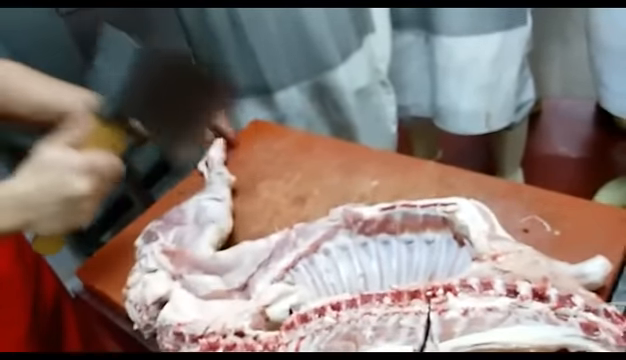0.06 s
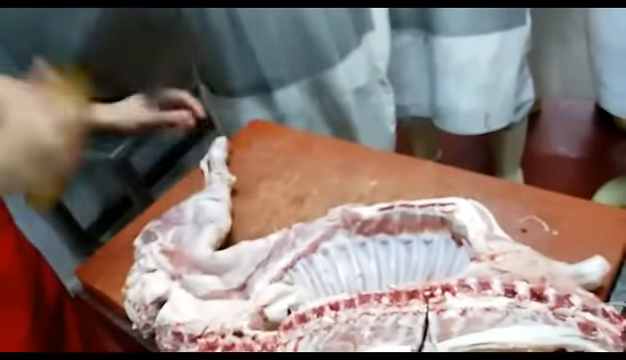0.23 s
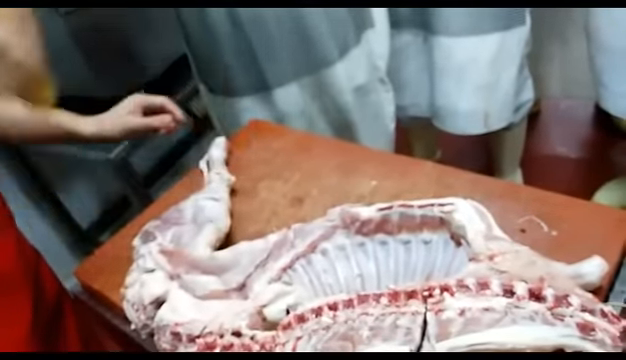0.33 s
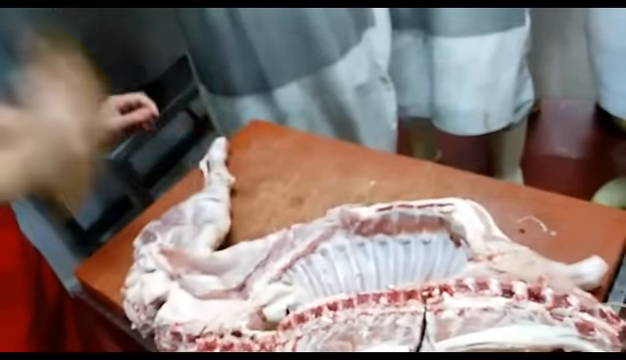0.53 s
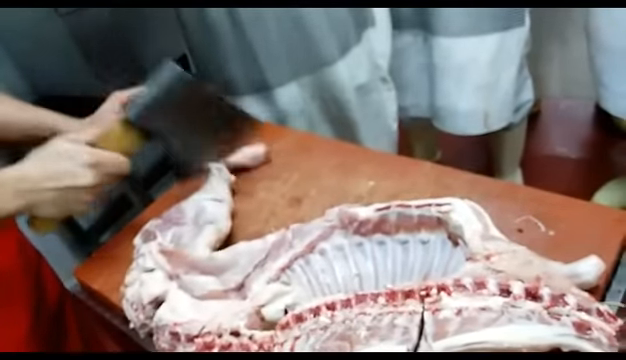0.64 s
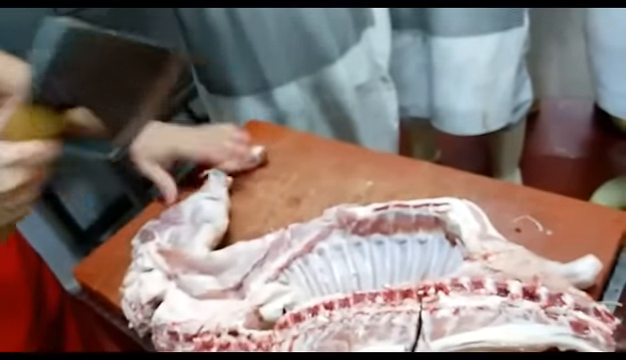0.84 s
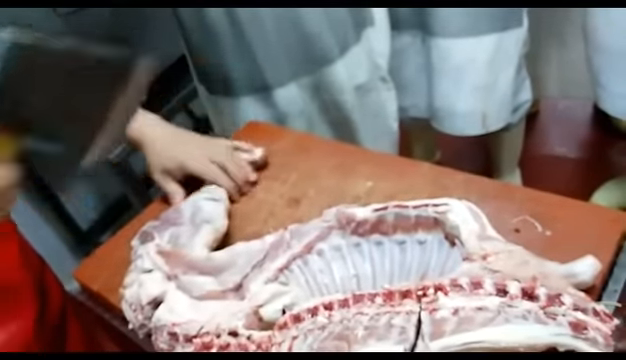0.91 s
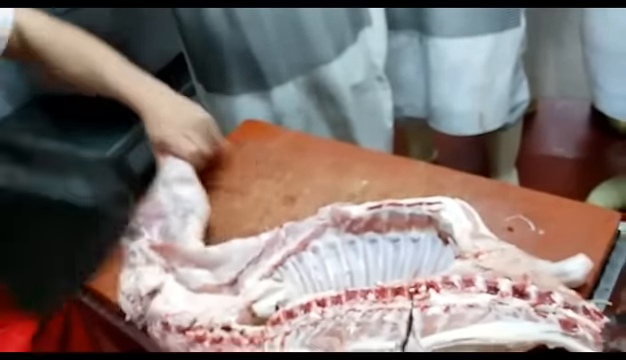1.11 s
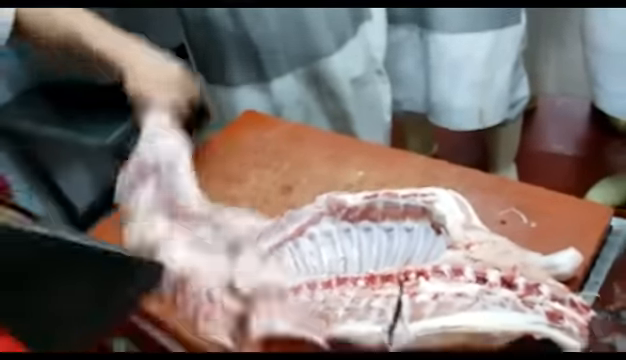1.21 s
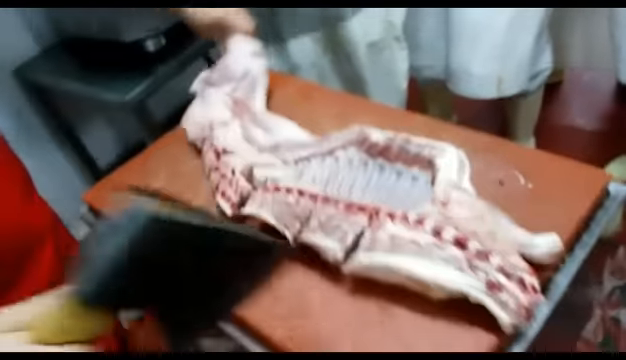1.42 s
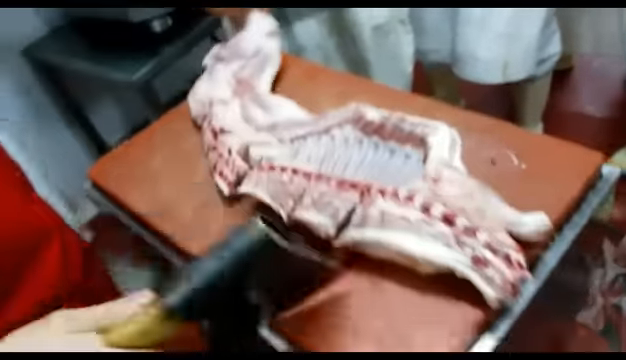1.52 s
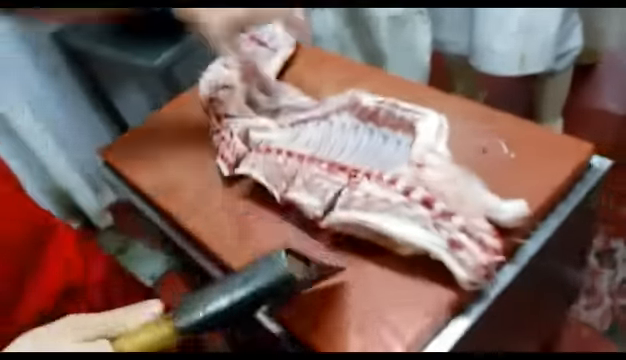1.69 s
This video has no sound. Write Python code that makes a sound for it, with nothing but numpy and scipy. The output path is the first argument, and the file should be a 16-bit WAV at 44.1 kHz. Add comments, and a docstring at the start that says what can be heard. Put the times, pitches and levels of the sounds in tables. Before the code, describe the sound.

Cleaver chopping meat, close and loud, in a hard-walled room with faint air and low mains hum. At 0.23 s a hard, bright crack hits the wooden block, block and blade ringing with strong echo. Wet rubbing and sticky smacks come around 0.8-1.0 s. At 1.16 s a duller, meaty thud crunches bone. The carcass knocks the table hollowly at 1.38 s, then slides wetly until about 1.75 s.

```python
"""Room air and a machine's mains hum come first, in a hard-walled butcher's room with a stereo microphone.
A heavy cleaver then chops a lamb shank on a wooden block: noise bursts, ringing modes and a wall answer,
loud enough to drive the recorder's limiter. Wet meat rubs and smacks in swells of grainy noise; a duller
blow thuds on damped sines and crunches bone in rough noise. The swung carcass knocks the table, rung by
modes, and slides wetly over the block."""
import sys
import numpy as np
from scipy import signal
from scipy.fft import rfft, irfft, next_fast_len
from scipy.io import wavfile
from scipy.ndimage import uniform_filter1d, minimum_filter1d, map_coordinates

SR = 44100
rng = np.random.default_rng(int(sys.argv[2]) if len(sys.argv) > 2 else 0)


def to_wav(sig):
    """Store sig (one row per channel, or 1-D mono) as 16-bit WAV at the path in sys.argv[1].

    Samples outside -1..1 are clipped; the rate is SR.
    """
    pcm = np.clip(np.atleast_2d(sig), -1, 1) * 32767
    pcm = np.round(pcm).astype(np.int16)
    wavfile.write(sys.argv[1], SR, pcm.T)  # frames by channels


N = 77175  # length in samples


def amp(db):
    """Decibels to gain."""
    return 10 ** (np.asarray(db) / 20)


def unit(x):
    """Scale to rms 1."""
    return x / np.sqrt(np.mean(x ** 2) + 1e-20)


def along(points, hz):
    """Read a curve of (f/Hz, value) points on a log frequency axis."""
    f, v = np.transpose(points)
    return np.interp(np.log(hz + 1), np.log(f + 1), v)


def since(s):
    """Seconds since time s, zero before it."""
    return np.maximum(np.arange(N) / SR - s, 0)


def wobble(rate):
    """A smooth random curve through normal random knots, rate knots a second."""
    knots = rng.standard_normal(int(N * rate / SR) + 4)
    return map_coordinates(knots, [np.arange(N) * rate / SR])


def filtered(x, response):
    """Multiply the spectrum of x by a response of frequency."""
    m = next_fast_len(N + SR // 2)
    spectrum = rfft(x, m) * response(np.fft.rfftfreq(m, 1 / SR))
    return irfft(spectrum, m)[..., :N]


# likeness of the two microphone channels: f/Hz, correlation [0-1]
CHANNEL_LIKENESS = [(60, .85), (140, .87), (250, .78), (500, .55), (1000, .08), (4000, .02)]


def half_angle(hz):
    """Half the phase angle [rad] whose cosine is the likeness of the channels."""
    return np.arccos(np.clip(along(CHANNEL_LIKENESS, hz), -1, 1)) / 2


def noise(colour):
    """Stereo noise of rms 1, alike in the bass and nearly unrelated in the treble."""
    def mid_side_response(hz):
        return amp(along(colour, hz)) * [np.cos(half_angle(hz)), np.sin(half_angle(hz))]

    mid, side = filtered(rng.standard_normal((2, N)), mid_side_response)
    return unit(np.array([mid + side, mid - side]))


def strike(s, rise, t60):
    """An envelope that rises from time s (time constant rise/s) and dies by 60 dB in t60/s."""
    t = since(s)
    return (1 - np.exp(-t / rise)) * np.exp(-np.log(1000) * t / t60)


def pan(x, left_db):
    """Place a sound left of the microphone's centre by a level difference; negative is right."""
    return x * amp(np.array([[left_db], [-left_db]]) / 2)


def ring(modes, s, rise, waver):
    """Decaying modes whose phase wavers [rad]; the higher ones reach the channels out of step."""
    out = np.zeros((2, N))
    for hz, db, t60 in modes:
        apart = half_angle(hz) * rng.choice([-1, 1])
        phase = 2 * np.pi * hz * since(s) + waver * wobble(29.88)
        phase = phase + np.array([[apart], [-apart]])
        out += amp(db) * strike(s, rise, t60) * np.sin(phase)
    return out


# reverberation of the hard-walled room: f/Hz, t60/s
ROOM_DECAY = [(60, 1), (250, 0.81), (1000, 0.69), (3000, .72), (7000, 0.6), (14000, 0.41)]


def answer(s, colour, build_s):
    """The walls' answer to a sharp sound at time s: it builds up, then dies at each frequency's own speed."""
    hz, t, z = signal.stft(noise(colour), SR, nperseg=512)
    decay = np.exp(-np.log(1000) * np.maximum(t - s, 0) / along(ROOM_DECAY, hz)[:, None])
    tail = signal.istft(z * decay, SR, nperseg=512)[1][:, :N]
    return tail * (1 - np.exp(-since(s) / build_s))


def room(x, wet_db, build_s):
    """A longer sound plus its reverberation, by convolution with a decaying noise tail."""
    tail = answer(0, [(1, 0), (SR, 0)], build_s)
    tail = tail / np.linalg.norm(tail[0])
    return x + amp(wet_db) * signal.fftconvolve(x, tail, axes=1)[:, :N]


# spectrum of the room air: f/Hz, level/dB per Hz (relative)
AIR_COLOUR = [(20, -46), (50, -17), (72, -18), (144, -10), (240, -18), (480, -19), (620, -15.5), (945, -25),
              (1500, -29.5), (2600, -31), (5280, -36.5), (7000, -37), (15500, -47)]
# mains hum of the machine behind: f/Hz, level/dB (rms)
MACHINE_HUM = [(49.5, -43.5), (99, -55.5), (149, -60)]


def background():
    """Room air as gently drifting noise, and a machine's mains hum as sines with wavering phase."""
    hum = 0
    for hz, db in MACHINE_HUM:
        phase = 2 * np.pi * hz * since(0) + .15 * wobble(2)
        hum = hum + amp(db) * np.sqrt(2) * np.sin(phase)
    air_db = -43.5 + 0.33 * wobble(3.1)
    return amp(air_db) * noise(AIR_COLOUR) + hum


CHOP_S, CHOP_DB = .2308, -4  # t/s, level/dB
# spectrum of the chop through the shank: f/Hz, level/dB per Hz (relative)
CHOP_SPECTRUM = [(25, -35), (55, -19), (90, -10.5), (136, -7), (175, -8), (250, -3.5), (460, -4), (650, -8),
                 (1000, -5), (1350, -12.5), (1700, -10.5), (3100, -10), (5000, -15), (7400, -10),
                 (11000, -16), (15500, -20)]
# ringing modes of the block on its table: f/Hz, level/dB (relative), t60/s
BLOCK_MODES = [(59.74, -8, 0.97), (145, -4.5, 0.92), (252.4, -3, 0.64), (340.7, -10.5, 0.99),
               (458, -20, 0.27), (513, -5, 0.21), (651.6, 0, 0.74), (895, -21, 0.8), (956, -5.5, 0.57)]
# ringing modes of the steel blade: f/Hz, level/dB (relative), t60/s
BLADE_MODES = [(1493, -22, 4.5), (1458, -19, 2.8), (1663, 0, 0.21), (2116, -6, 0.55), (3060, -7, 0.93),
               (3095, -1, 0.74), (4680, -5, .5), (5560, -3, .5), (6615, -8, 0.41), (7260, 4, 0.36)]


def chop():
    """The blade snaps the shank with a hard clack and hits the block; block, steel and room ring on."""
    crack = amp(CHOP_DB) * strike(CHOP_S, rise=0.0001, t60=0.14) * noise(CHOP_SPECTRUM)
    walls = amp(-2.5) * answer(CHOP_S, CHOP_SPECTRUM, build_s=0.016)
    clack_modes = [(1730, -4.3, 0.016), (864, 0.2, 0.012), (485, -3.7, 0.03)]  # f/Hz, level/dB, t60/s
    clack = amp(-10) * ring(clack_modes, CHOP_S, rise=0.00021, waver=0.76)
    block = amp(-14) * ring(BLOCK_MODES, CHOP_S, rise=0.014, waver=0.52)
    blade = amp(-21.5) * ring(BLADE_MODES, CHOP_S, rise=0.00088, waver=0.77)
    return pan(crack + clack, left_db=2) + pan(walls + block, left_db=0) + pan(blade, left_db=-4)


# wet meat rubbing on the block and in the hand, before the slide and fizz gains:
# peak t/s, level/dB, rise/s, fall/s (both Gaussian widths)
RUB_SWELLS = [(.9, -43.5, 0.09, 0.13), (1.46, -35.5, 0.046, 0.053), (1.565, -36, 0.034, 0.024),
              (1.72, -46.5, 0.15, 0.031)]
# spectrum of the rubbing and smacks: f/Hz, level/dB per Hz (relative)
RUB_SPECTRUM = [(900, -28), (2000, -0.5), (5000, 0), (7600, -1), (10000, -6), (15500, -16)]
# sticky little smacks of the meat: t/s, level/dB
MEAT_SMACKS = [(0.764, -50.5), (.803, -48), (0.864, -40), (.903, -34.5), (1.015, -35.5), (1.605, -35.5)]


def rubbing():
    """Wet meat slides in grainy swells and comes unstuck with little smacks; its fizz lies to the right."""
    t = np.arange(N) / SR
    swells = 0
    for s, db, rise, fall in RUB_SWELLS:
        width = np.where(t < s, rise, fall)
        swells = swells + amp(db) * np.exp(-((t - s) / width) ** 2 / 2)
    smacks = sum(amp(db) * strike(s, rise=.0005, t60=0.02) for s, db in MEAT_SMACKS)
    slide_grains = unit(amp(1.7 * wobble(500)) * noise(RUB_SPECTRUM))
    fizz_colour = [(5000, -19), (11000, 8), (15500, -2.5)]  # f/Hz, level/dB per Hz
    fizz_grains = unit(amp(2 * wobble(570)) * noise(fizz_colour))
    slide = room(amp(-5.5) * swells * slide_grains, wet_db=-9.5, build_s=0.0059)
    fizz = pan(amp(-20.5) * swells * fizz_grains, left_db=-14)
    return slide + fizz + pan(smacks * noise(RUB_SPECTRUM), left_db=-5)


BLOW_S, BLOW_DB = 1.158, -12.5  # t/s, level/dB
# spectrum of the blow into meat: f/Hz, level/dB per Hz (relative)
BLOW_SPECTRUM = [(40, -34), (100, -27), (220, -6), (350, -1.5), (580, -10), (850, -8.5), (1200, -14),
                 (2800, -20), (4800, -33.5), (12900, -34.5), (15500, -40)]
# the block's thud, damped by the meat: f/Hz, level/dB, rise/s, t60/s
THUD_MODES = [(138.4, -2, 0.0052, 0.087), (212, -8.5, 0.0081, 0.11), (552, -6.5, 0.0023, 0.044)]


def blow():
    """The cleaver sinks into meat: a slap and a low, quickly damped thud; the table sways after it."""
    slap = amp(BLOW_DB) * strike(BLOW_S, rise=0.00025, t60=0.15) * noise(BLOW_SPECTRUM)
    walls = amp(-15.5) * answer(BLOW_S, BLOW_SPECTRUM, build_s=0.014)
    thud = 0
    for hz, db, rise, t60 in THUD_MODES:
        thud = thud - amp(db) * strike(BLOW_S, rise, t60) * np.sin(2 * np.pi * hz * since(BLOW_S))
    thud = room(np.array([thud, thud]), wet_db=-5, build_s=0.0067)
    block = amp(-26.5) * ring(BLOCK_MODES, BLOW_S, rise=0.0048, waver=0.22)
    sway = amp(-20.5) * ring([(59.15, 0, 0.74)], BLOW_S + 0.0275, rise=0.034, waver=0.85)
    return pan(slap + walls, left_db=-1.0) + thud + block + sway


# bone giving way under the blade: t/s, level/dB, rise/s, t60/s
BONE_CRUNCHES = [(1.17, -1.5, 0.028, 0.12), (1.257, -21.5, 0.0062, 0.1)]
# spectrum of the bone: f/Hz, level/dB per Hz (relative)
BONE_SPECTRUM = [(240, -4), (400, -8.5), (1490, -13.5), (1610, -11), (1790, -3.5), (1960, -8.5),
                 (2920, -5.5), (4420, -15.5), (7670, -20), (15500, -28.5)]


def crunch():
    """Bone splinters: noise roughened by a fast random level, like a dense run of tiny cracks."""
    splinters = sum(amp(db) * strike(s, rise, t60) for s, db, rise, t60 in BONE_CRUNCHES)
    grains = unit(amp(1.3 * wobble(900)) * noise(BONE_SPECTRUM))
    return pan(room(splinters * grains, wet_db=-8, build_s=0.005), left_db=-1.0)


KNOCK_S, KNOCK_DB = 1.382, -17.5  # t/s, level/dB
# spectrum of the carcass knocking the table: f/Hz, level/dB per Hz (relative)
KNOCK_SPECTRUM = [(60, -16), (130, -16.5), (230, -8), (380, -8), (600, -6), (1190, -17), (1850, -17),
                  (4000, -30.5), (8000, -41.5), (15000, -47)]
# the table's hollow ring: f/Hz, level/dB (relative), t60/s
TABLE_MODES = [(304, -3, .42), (373, -.5, .54), (542, -2, .2), (856, -10, .22), (1519, -16, .22),
               (1860, -12, .2)]


def knock():
    """The swung carcass bumps the table, which rings hollowly."""
    bump = amp(KNOCK_DB) * strike(KNOCK_S, rise=0.0038, t60=0.15) * noise(KNOCK_SPECTRUM)
    walls = amp(-20) * answer(KNOCK_S, KNOCK_SPECTRUM, build_s=0.0047)
    table = amp(-15) * ring(TABLE_MODES, KNOCK_S, rise=0.0023, waver=.22)
    return pan(bump + walls, left_db=-2) + table


def scene():
    """All sounds at the microphone."""
    return background() + chop() + rubbing() + blow() + crunch() + knock()


LIMIT_DB, LIMIT_WINDOW_S, LIMIT_HOLD_S = -8, 0.012, 0.021  # rms ceiling, averaging and hold times
LOW_CUT_HZ, TOP_HZ, CLIP_TOP = 27.7, 15700, 1.13  # CLIP_TOP: amplitude the soft clip tends to
# unlike microphone ports: f/Hz, right over left level/dB
PORT_DIFFERENCE = [(150, 0), (400, -2), (700, .5), (1250, 3), (2500, 0), (8000, -.5), (13000, 2.5)]


def record(dry):
    """Two unlike ports, a low cut, a limiter on each channel, soft clipping and the band limit."""
    x = filtered(dry, lambda hz: amp(along(PORT_DIFFERENCE, hz) * np.array([[-1], [1]]) / 2))
    low_cut = signal.butter(2, LOW_CUT_HZ, 'highpass', fs=SR, output='sos')
    x = signal.sosfilt(low_cut, x)
    power = uniform_filter1d(x ** 2, int(LIMIT_WINDOW_S * SR) + 1)
    level = np.sqrt(np.abs(power) + 1e-12)
    hold = int(LIMIT_HOLD_S * SR) // 2 * 2 + 1  # an odd number of samples
    # keep the lowest gain of the hold time just past, then smooth its steps
    gain = minimum_filter1d(np.minimum(1, amp(LIMIT_DB) / level), hold, origin=hold // 2)
    x = x * uniform_filter1d(gain, size=128)
    x = x / (1 + np.abs(x / CLIP_TOP) ** 6) ** (1 / 6)
    return filtered(x, lambda hz: 1 / np.sqrt(1 + (hz / TOP_HZ) ** 200))


dry = scene()
out = record(dry)
to_wav(out)
```